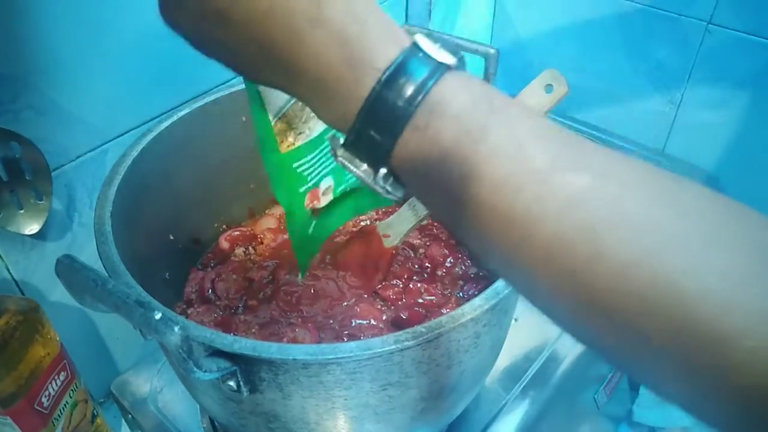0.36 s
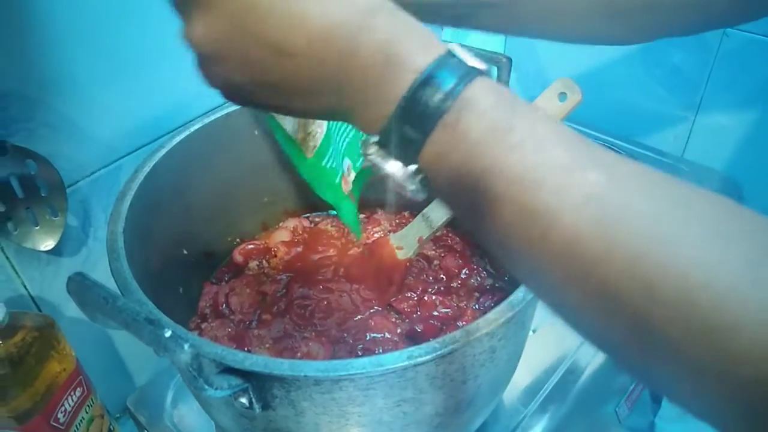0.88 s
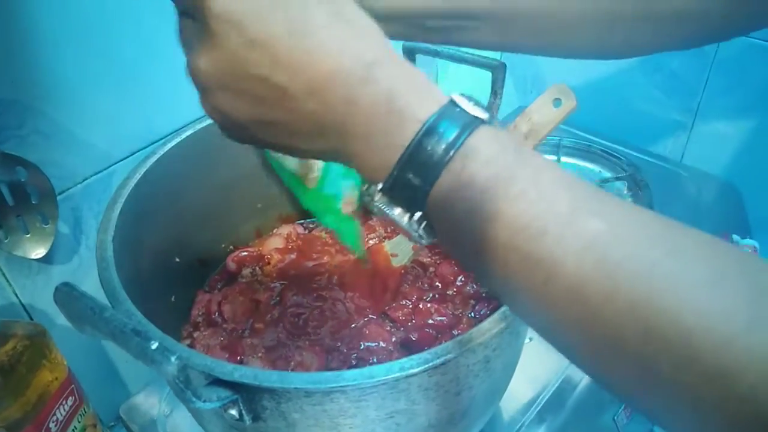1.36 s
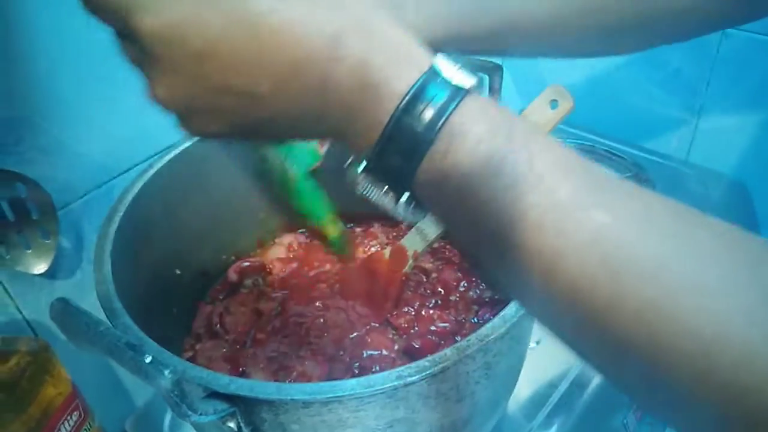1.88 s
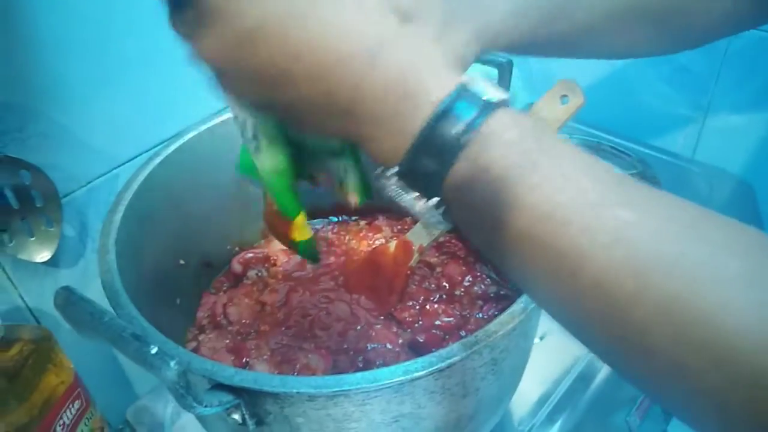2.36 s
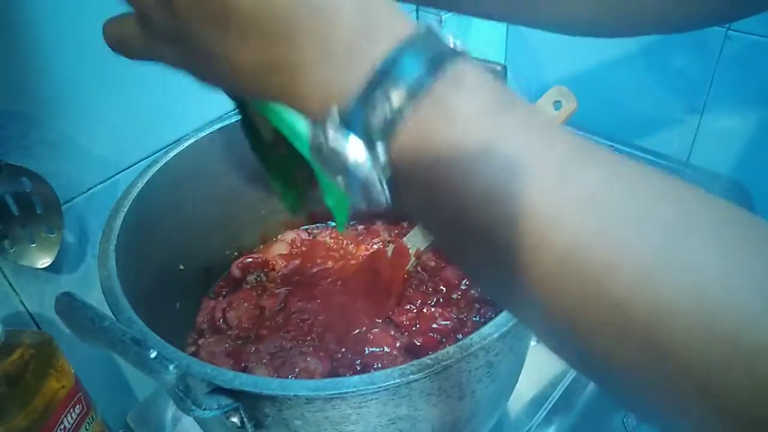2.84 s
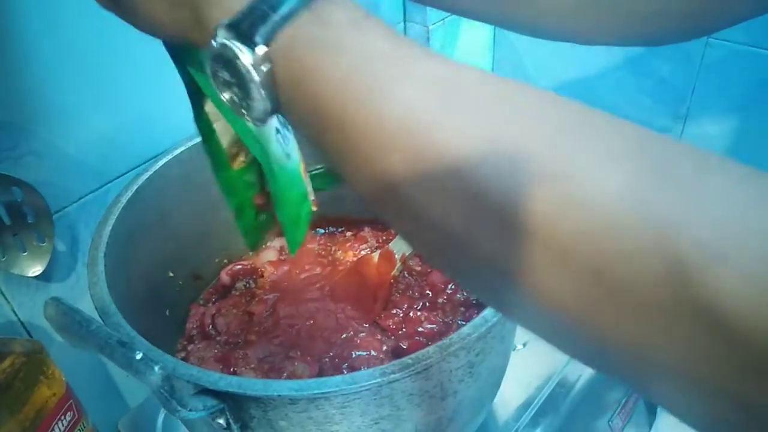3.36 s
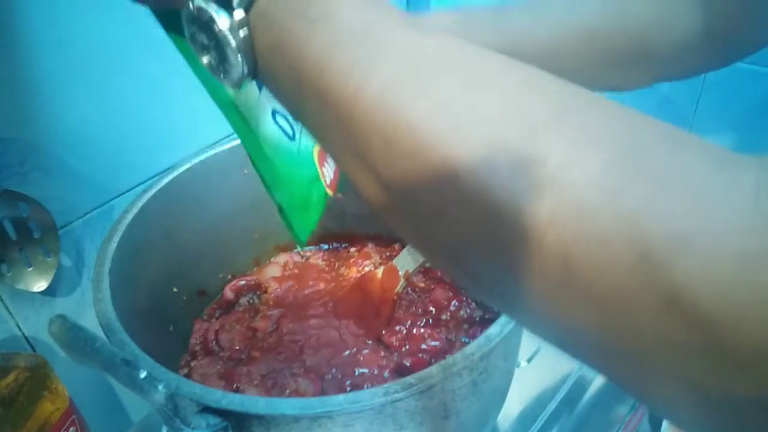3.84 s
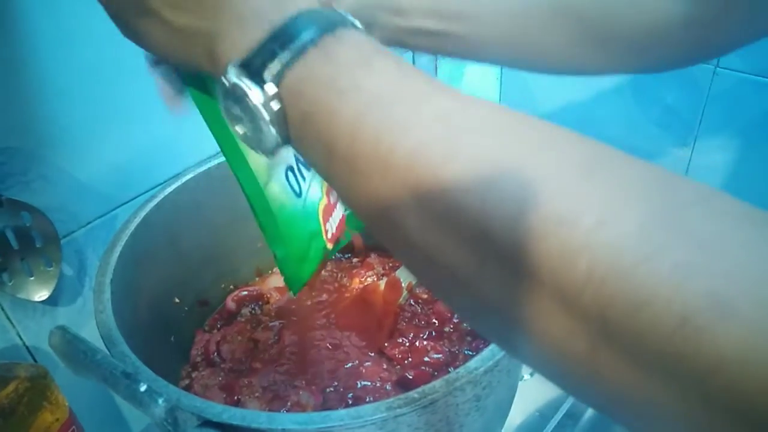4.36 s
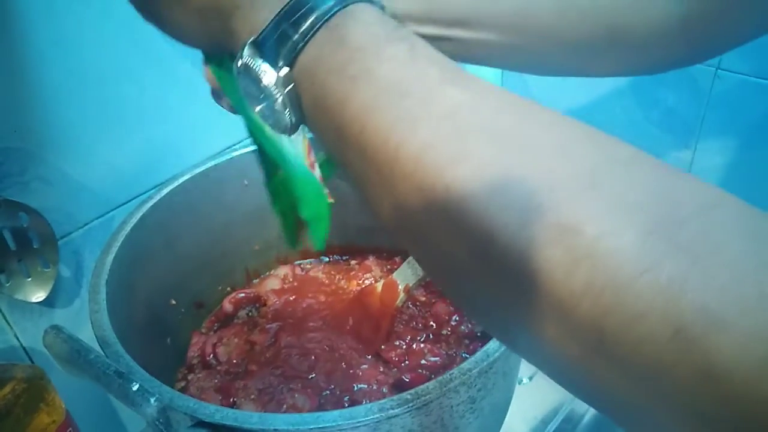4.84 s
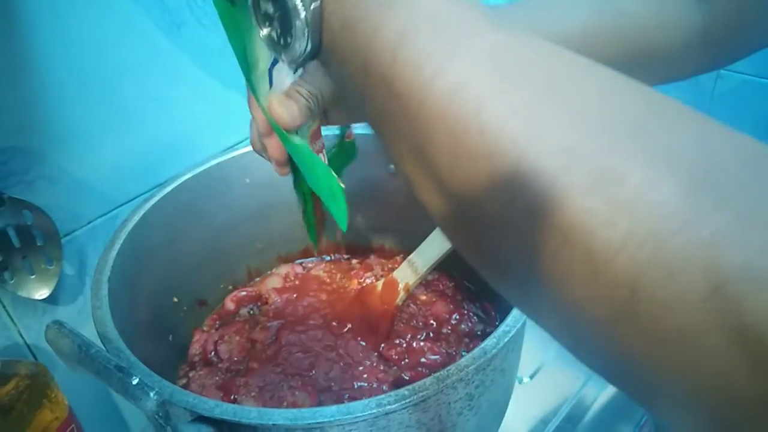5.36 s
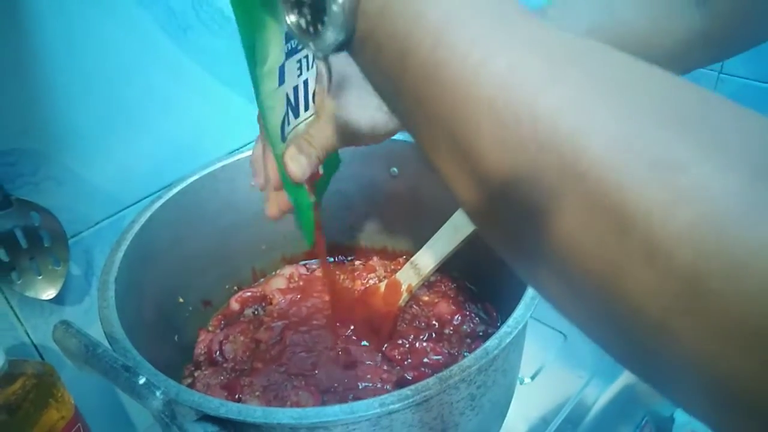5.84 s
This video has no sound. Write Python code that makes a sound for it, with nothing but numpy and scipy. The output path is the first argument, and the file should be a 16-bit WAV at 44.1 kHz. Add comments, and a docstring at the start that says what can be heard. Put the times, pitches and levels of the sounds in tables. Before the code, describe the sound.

Hands squeeze and shake a foil pouch very close: bright irregular snaps and fine crinkling, strongest just before one second and busy until nearly three, then sparser with a few sharp clicks. Small pitched bubble pops and a thin simmering hiss lie below, with a low rumble throbbing about twice a second. A small tiled kitchen adds short tails; two spaced microphones with noise suppression make the hiss swell after snaps.

```python
"""Hands squeeze and shake a foil pouch, close by: it snaps in showers of clicks and rustles in clumps of tiny ones.
Below it sauce simmers in a metal pot: bubbles pop as short swelling tones over a hiss of patchy noise.
A small tiled kitchen answers with noisy tails; a low noise rumble throbs underneath, with one knock.
Two spaced microphones feed a noise suppressor that pushes the steady hiss down and lets it through after each snap."""
import sys
import numpy as np
from scipy import signal
from scipy.io import wavfile
from scipy.ndimage import uniform_filter1d, minimum_filter1d

SR = 44100
rng = np.random.default_rng(int(sys.argv[2]) if len(sys.argv) > 2 else 0)


def dump_mix(stems):
    """Bounce the given channels to the path in sys.argv[1] as a 16-bit WAV at rate SR."""
    frames = np.atleast_2d(stems).T  # one column per channel
    limited = np.clip(frames, -1, 1)  # hard clip at full scale
    pcm = np.round(limited * 32767).astype(np.int16)
    wavfile.write(sys.argv[1], SR, pcm)


def boost_factor(decibels):
    """Convert a level in decibels to a linear amplitude factor."""
    exponent = np.asarray(decibels, float) / 20
    return 10 ** exponent


N = 273861  # samples

# foil snaps, levels at the top of the burst before each crease's left-right lean:
# snap_s, treble_db, middle_db, low_db, burst_ms
FOIL_SNAPS = [(0.0655, -38.5, -50, -56, 12), (0.1568, -36, -50.5, -54.5, 4), (0.3826, -41, -55, -69, 14),
              (0.5072, -31.5, -50, -49, 6.4), (0.5643, -43, -48, -48.5, 3.4),
              (0.784, -33.5, -38, -33.5, 4.3), (0.8047, -28.5, -41, -39, 10), (0.84, -46, -31, -29.5, 5.94),
              (0.8583, -15, -17, -21, 2.36), (0.8676, -14.5, -25, -16, 2), (1.0524, -49, -80, -62, 11),
              (1.1936, -41.5, -57.5, -58, 13), (1.3054, -30.5, -78, -57, 5), (1.4037, -31, -48, -47, 6.5),
              (1.506, -22.5, -28, -28, 2.8), (1.672, -25.5, -40, -47.5, 5.3), (1.753, -46, -54, -39, 4.5),
              (1.7905, -30.5, -46, -38, 4.3), (1.8307, -22.5, -24, -22.5, 3.9),
              (1.8549, -27, -62, -24.5, 4.2), (1.966, -21, -33, -31, 3.2), (1.996, -25, -49, -52.5, 5.1),
              (2.1793, -28.5, -55, -69, 4.5), (2.1947, -31.5, -31.5, -39.5, 3.9),
              (2.3612, -27, -33, -56.5, 5.7), (2.378, -27.5, -37, -67, 5.4), (2.5018, -28, -72, -50, 8.1),
              (2.5288, -15, -50, -39.5, 3.5), (2.54, -30.5, -62, -53, 14), (2.5615, -26, -57, -56, 1.5),
              (2.59, -29.5, -73, -44, 23.5), (2.717, -32, -53.5, -51, 4.5), (2.802, -28.5, -60, -52, 2.6),
              (2.816, -29.5, -67, -69, 8), (3.2126, -43.5, -72, -56.5, 3.9), (3.3075, -43, -53.5, -61, 10),
              (3.3993, -42.5, -60, -59, 12), (3.6308, -35, -24.5, -19.5, 2.4),
              (3.647, -22.5, -30.5, -38, 11), (3.745, -45, -38, -35, 6), (3.9009, -44.5, -52, -54.5, 15),
              (3.92, -33, -60.5, -59, 3), (4.199, -27, -31.5, -45.5, 10.1), (4.2111, -17, -26, -48, 2),
              (4.377, -34, -56, -54, 11), (4.5306, -41, -55, -79, 6.2), (4.6414, -38.5, -30, -52, 3.5),
              (4.6686, -34, -42, -53, 13), (4.722, -42, -50, -49, 5.5), (5.0205, -43, -58.5, -56, 8.2),
              (5.132, -36, -32, -35.5, 2.5), (5.464, -42.5, -68, -60, 24), (5.6324, -37.5, -81, -69.5, 2.7),
              (5.747, -38, -62.5, -66, 5.2), (5.787, -42, -66.5, -66, 3.1), (5.9046, -27, -39, -49, 2.02),
              (5.922, -36, -51.5, -64, 15), (5.98, -43, -77, -60, 18)]
# spectrum of the snapping foil: frequency_hz, relative_level_db
FOIL_SPECTRUM = [(210, -33.5), (350, 0.5), (409, 14), (471, 20), (623, -14.5), (763, 2.5), (1060, 7),
                 (2000, 9), (2870, 1.5), (3900, -1), (5000, -1), (6100, 0), (7100, 2.5), (11100, -13.5),
                 (14500, -24.5)]
# handling of the pouch between snaps: time_s, level_db
RUSTLE_LEVEL = [(0.0, -55.5), (0.62, -56), (1.4, -55), (1.5, -83), (1.78, -47.5), (1.89, -58), (2.3, -65),
                (2.56, -55.5), (2.92, -58), (3.14, -86), (3.3, -54), (3.95, -73.5), (4.3, -60.5),
                (4.42, -55), (4.7, -56), (5.53, -70.5), (5.93, -57.5), (6.21, -79)]
# spectrum of the rustle: frequency_hz, relative_level_db
RUSTLE_SPECTRUM = [(750, -30.5), (1030, -7), (1500, -24), (1980, -3), (2390, -13.5), (3240, -24),
                   (5300, -10), (8520, -2), (14500, -37.5)]
# pitched pops of bubbles, the hollow pot and pockets in the pouch, levels ahead of the microphone gains:
# time_s, peak_db, pitch_hz
BUBBLE_POPS = [(0.348, -32.5, 1014), (0.597, -41.5, 660), (0.6, -35.5, 1033), (0.615, -31.5, 1064),
               (0.67, -35.5, 1074), (0.8415, -25, 1780), (0.8585, -11.5, 2900), (0.87, -21, 1065),
               (0.861, -29, 683), (0.873, -31.5, 585), (0.887, -36, 424), (1.14, -50, 855),
               (1.146, -39, 1130), (1.312, -47.5, 1185), (1.507, -39, 570), (1.524, -44, 401),
               (1.7559, -36.5, 2040), (1.79, -27, 1990), (1.813, -30, 1037), (1.8338, -27, 1760),
               (1.836, -40.5, 767), (2.135, -48, 993), (2.198, -40, 1380), (2.239, -46.5, 940),
               (2.37, -49, 442), (2.596, -36.5, 986), (3.566, -50, 434), (3.697, -43, 1000),
               (3.774, -32, 1043), (4.199, -47, 510), (4.21, -39, 923), (4.469, -51.5, 2230),
               (4.564, -54, 1430), (4.621, -48.5, 1070), (4.642, -31.5, 2520), (4.713, -43.5, 1790),
               (4.847, -49, 1115), (4.848, -50, 1900), (4.902, -41.5, 1910), (4.903, -48.5, 1060),
               (4.928, -48.5, 427), (5.104, -50.5, 1780), (5.134, -34, 1720), (5.499, -48.5, 521),
               (5.518, -48, 1090), (5.515, -42.5, 1770), (5.527, -47.5, 2350)]
# decay of the tiled kitchen: frequency_hz, t60_s
KITCHEN_DECAY = [(400, 0.32), (1060, 0.25), (2790, 0.29), (7350, 0.26)]
# left-right likeness of the simmer and the room tails: frequency_hz, likeness (1 = alike)
MIC_LIKENESS = [(60, 0.86), (240, 0.7), (930, 0.35), (3670, -0.02), (14400, 0.04)]
# spectrum of the simmer: frequency_hz, relative_level_db
SIMMER_SPECTRUM = [(150, -34), (250, -5), (575, 3.5), (864, -3.5), (1020, 1), (1440, -11.5), (2200, -6),
                   (4120, -13.5), (5790, -7), (8280, 0.5), (9480, -12), (12700, -24.5), (14500, -40.5)]
# level of the simmer before its flutter and the suppressor: time_s, level_db
SIMMER_LEVEL = [(0, -54), (2.2, -53.5), (3.05, -57), (4, -56.5), (6.21, -56.5)]
# spectrum of the low rumble: frequency_hz, relative_level_db
RUMBLE_SPECTRUM = [(15, -54.5), (25, -41.5), (27, -21.5), (44, -29), (91, 11), (111, 3), (152, -25.5),
                   (182, -4.5), (215, -21.5), (320, -42.5), (420, -42), (700, -120)]
# level of the low rumble, about which it throbs: time_s, level_db
RUMBLE_LEVEL = [(0.0, -53.5), (0.95, -54.5), (1.3, -47), (1.8, -53), (6.21, -57.5)]


def read(points, hz):
    """Reads a table along a log-frequency axis."""
    f, value = np.transpose(points)
    return np.interp(np.log(hz + 1), np.log(f + 1), value)


def curve(rows):
    """Joins (time_s, value) rows into one value a sample."""
    return np.interp(np.arange(N) / SR, *np.transpose(rows))


def evened(x):
    """Scales to rms 1."""
    return x / np.sqrt(np.mean(x ** 2) + 1e-20)


def add(mix, s, sound):
    """Mixes a sound in at time s."""
    part = mix[..., round(s * SR):][..., :sound.shape[-1]]
    part += sound[..., :part.shape[-1]]


def colour(points):
    """Causal (minimum-phase) filter with the given spectrum, energy 1."""
    gain_db = np.maximum(read(points, abs(np.fft.fftfreq(4096, 1 / SR))), -100)
    log_gain = np.log(boost_factor(gain_db))
    taps = np.fft.ifft(np.exp(np.conj(signal.hilbert(log_gain)))).real[:1024]
    return taps / np.linalg.norm(taps)


def band(x, edges_hz):
    """Steep band-pass scaled to rms 1."""
    edges_hz = np.clip(edges_hz, 20, SR / 2 - 99)
    sos = signal.butter(N=5, Wn=edges_hz, btype="band", fs=SR, output="sos")
    return evened(signal.sosfilt(sos, x))


def flutter(seconds):
    """Random wander of rms 1 that changes within the given time."""
    span = max(round(seconds * SR), 2)
    return evened(uniform_filter1d(uniform_filter1d(rng.standard_normal(N), span), span))


def two_mics(left, other, points, hz):
    """Makes the right side share part of the left in each band, as two spaced microphones do."""
    same = np.clip(read(points, hz), -1, 1)[:, None]
    return np.array([left, same * left + np.sqrt(1 - same ** 2) * other])


def steady(points, size, patchy_db, same):
    """Two-channel noise from random short-time spectra with narrow drifting streaks."""
    frames, hz = 4 * N // size + 5, np.fft.rfftfreq(size, 1 / SR)
    a, b, c, d, patches = rng.standard_normal((frames, len(hz), 5)).T
    patches = uniform_filter1d(patches, size=3, axis=0)  # across frequency
    patches = evened(uniform_filter1d(patches, size=20, axis=1))  # along time
    z = two_mics(a + 1j * b, c + 1j * d, same, hz)
    z *= boost_factor(read(points, hz)[:, None] + patchy_db * patches)
    return evened(signal.istft(z, nperseg=size, noverlap=3 * size // 4)[1][:, :N])


def pop(peak_db, hz, cycles, rise):
    """A tone that swells and dies while its pitch drifts; high pops start abruptly, low ones are rounded."""
    turns = np.arange(round(1.5 * cycles * SR / hz)) * hz / SR
    shape = turns ** np.clip(1900 / hz, .6, 2) * boost_factor(-100 * turns / cycles)
    tone = np.sin(2 * np.pi * (turns + rise * turns ** 2 / cycles))
    return boost_factor(peak_db) * shape / shape.max() * tone


def faint_creases():
    """Weak snaps at chance moments, in the columns of FOIL_SNAPS."""
    per_s, lowest_db, spread_db, body_db, mean_ms = 4, -54, 6, -11, 9
    rows = []
    for when, size, long in rng.random((round(per_s * N / SR), 3)):
        treble_db = lowest_db + spread_db * size
        rows.append((0.0097 + when * N / SR, treble_db, treble_db + body_db,
                     treble_db + 2 * body_db, mean_ms * (.5 + long)))
    return rows


def burst_shape(t, burst_ms):
    """A soft noise ramp leads into the snap, which swells and dies, then crackles as the foil settles."""
    ramp_s, ramp_db = 0.0042, -17.5
    u = 1000 * np.maximum(t, 0) / max(burst_ms, .8)  # time in burst lengths
    settling = 0.09 * np.exp(-t / 0.05) * np.repeat(rng.random(len(t) // 64) < .15, 64)
    fade = (np.exp(-u) + settling) * (1 - np.exp(-u)) * 2
    return fade + boost_factor(ramp_db) * np.exp(np.minimum(t / ramp_s, -u))


def foil_snaps():
    """A crease buckles: a shower of clicks swells and dies, coloured by the foil; weak creases sound thinner."""
    low_hz, middle_hz, treble_hz = (840, 1700), (1844, 3617), (3830, 14000)
    thin_below_db, thin_hz_per_db = -26, 200  # weaker snaps lose the lower treble
    treble_rise_s = 0.0024  # the treble is halved at the snap and recovers
    lean_db, lean_scatter_db = 1.2, 3  # left over right, and spread from crease to crease
    left_late_ms, late_scatter_ms = 0.22, 0.12  # the pouch is nearer the right microphone
    out, foil = np.zeros((2, N)), colour(FOIL_SPECTRUM)
    t = (np.arange(5120) - 1024) / SR  # starts ahead of the snap, for the lead-in ramp
    treble_rise = 1 - .5 * np.exp(-abs(t) / treble_rise_s)
    for s, treble_db, middle_db, low_db, burst_ms in FOIL_SNAPS + faint_creases():
        pan_db = lean_db + lean_scatter_db * rng.standard_normal()
        late_ms = left_late_ms + late_scatter_ms * rng.standard_normal()
        click_gain = boost_factor(1.3 * np.minimum(rng.exponential(1, len(t)), 3))
        shower = rng.standard_normal(len(t)) * click_gain * (rng.random(len(t)) < .5)
        fade = burst_shape(t, burst_ms)
        # each crease rings its own way
        facets = list(zip(np.geomspace(700, 14000, num=48), 2.4 * rng.standard_normal(48)))
        ring = signal.oaconvolve(shower * fade, foil)
        ring = signal.oaconvolve(ring, colour(facets))[:len(t)]
        thinning_hz = thin_hz_per_db * np.clip(thin_below_db - treble_db, 0, 16)
        snap = boost_factor(low_db) * band(ring, low_hz) + boost_factor(middle_db) * band(ring, middle_hz)
        snap += boost_factor(treble_db) * band(ring, (treble_hz[0] + thinning_hz, treble_hz[1])) * treble_rise
        snap *= np.sqrt(np.mean(fade ** 2) + 1e-12)  # so levels hold for the top of the burst
        start = max(s + t[0] - .0001 * burst_ms, .001)
        add(out[0], start + late_ms / 1000, snap * boost_factor(pan_db / 2))
        add(out[1], start, snap * boost_factor(-pan_db / 2))
    return out


def pouch_rustle():
    """Dense tiny creases under the fingers, in clumps with lulls between."""
    click_gain = boost_factor(2.5 * np.minimum(rng.exponential(1, N), 4))
    clicks = rng.standard_normal(N) * click_gain * (rng.random(N) < 3000 / SR)  # about 3000 a second
    clumps = boost_factor(2.8 * flutter(.012) + 3.2 * flutter(.045))
    creases = signal.oaconvolve(clicks, colour(RUSTLE_SPECTRUM))[:N]
    return boost_factor(curve(RUSTLE_LEVEL)) * evened(clumps * creases)


def faint_bubbles():
    """Faint bubbles at chance moments, in the columns of BUBBLE_POPS."""
    per_s, lowest_db, spread_db, low_hz, high_hz = 10, -60, 7, 500, 2400
    when, size, pitch = rng.random((round(per_s * N / SR), 3)).T
    time_s = 0.0058 + when * (N / SR - .05)
    return list(zip(time_s, lowest_db + spread_db * size, low_hz * (high_hz / low_hz) ** pitch))


def bubbles():
    """Short ringing pops, each roughened by a weaker neighbour of nearby pitch."""
    cycles_at_1khz, longer_power = 21.3, 0.33  # cycles of a 100 dB decay; higher pops ring more cycles
    out = np.zeros(N)
    for s, peak_db, hz in BUBBLE_POPS + faint_bubbles():
        late, detune = rng.random(2)
        cycles = cycles_at_1khz * (hz / 1000) ** longer_power
        add(out, s - 1.8 / hz, pop(peak_db, hz, cycles, rise=0.0014))
        neighbour = pop(peak_db - 19, hz * (0.811 + 0.2 * detune), cycles, rise=.01)
        add(out, s + 0.00293 + 0.016 * late, neighbour)
    return out


def kitchen(x):
    """Sparse taps of random sign, each band dying at its own speed; three tails take turns; bass most alike."""
    build_s = 0.0017  # the tail builds up before it dies
    out, hz = np.zeros((2, N)), np.fft.rfftfreq(256, 1 / SR)
    turn = np.pi * 3.1 * np.arange(N) / SR
    for k in range(3):
        taps = np.zeros((2, SR // 2))
        at = np.arange(200, SR // 2 - 20, 20) + rng.integers(0, 20, (2, (SR // 2 - 201) // 20))
        np.put_along_axis(taps, at, rng.choice([-1., 1.], at.shape), 1)
        t, (left, right) = signal.stft(taps, SR, nperseg=256)[1:]
        decay = boost_factor(-60 * t / read(KITCHEN_DECAY, hz)[:, None]) * (1 - np.exp(-t / build_s))
        tail = signal.istft(two_mics(left, right, MIC_LIKENESS, hz) * decay, SR, nperseg=256)[1]
        share = np.sqrt(2 / 3) * np.cos(turn + k * np.pi / 3)
        out += signal.oaconvolve(x * share, tail / np.linalg.norm(tail[0]), axes=1)[:, :N]
    return out


def simmer():
    """The steady hiss of the sauce: patchy noise whose level flutters."""
    hiss = steady(SIMMER_SPECTRUM, size=1024, patchy_db=3.6, same=MIC_LIKENESS)
    return boost_factor(curve(SIMMER_LEVEL)) * hiss * boost_factor(1.4 * flutter(.015) + 2.2 * flutter(.07))


def knock():
    """One low falling tone near the right microphone."""
    out = np.zeros(N)
    add(out, 1.088, pop(-25, hz=118, cycles=5.5, rise=-0.15))
    return out * [[.3], [1.6]]  # left and right gain


def rumble():
    """Low noise that jumps up once a period and sags evenly."""
    first_s, period_s, fall_db = .04, .434, 13
    phase = (np.arange(N) / SR - first_s) / period_s % 1
    sag_db = -fall_db * uniform_filter1d(phase - .5, size=1500)
    noise = steady(RUMBLE_SPECTRUM, size=2048, patchy_db=0.9, same=[(30, 0.82), (130, 0.68), (300, 0.72)])
    return boost_factor(curve(RUMBLE_LEVEL) + sag_db) * noise


def scene():
    """Near sounds echo in the room; steady sounds lie beneath."""
    foil, pops = foil_snaps() + pouch_rustle(), bubbles()
    room = kitchen(boost_factor(-4.5) * (foil + pops))
    near = foil + pops * boost_factor([[.6], [-.6]])  # pops lean left, in dB
    return near + room + simmer() + rumble() + knock()


def low_pass(x):
    """Removes everything above the highest recorded frequency."""
    return signal.sosfilt(signal.butter(12, 14600, fs=SR, output="sos"), x)


def record(dry):
    """The suppressor opens each narrow band that jumps over its usual floor, holds it open, and shuts it."""
    hold_s, depth_db = 0.067, 9.5  # roughly how long a band stays open, how far it shuts
    hz, t, z = signal.stft(dry, SR, nperseg=512, noverlap=384)
    power = uniform_filter1d((abs(z) ** 2).mean(0), size=3, axis=0)
    power_db = 10 * np.log10(uniform_filter1d(power, size=7, axis=1) + 1e-14)
    over_db = power_db - np.percentile(power_db, 25, axis=1, keepdims=True)
    open_db = 10 + 1.86 * (hz < 3000)[:, None] + 3.0 * (hz < 700)[:, None]  # fully open this far over the floor
    shut = np.clip((open_db - over_db) / 5, 0, 1)
    frames = 2 * round(hold_s * SR / 256) + 1
    shut = minimum_filter1d(shut, frames, axis=1, origin=frames // 2)  # looks back, so openings last
    shut *= (hz > 300)[:, None]  # the bass is never shut
    gain = boost_factor(-depth_db * uniform_filter1d(shut, size=3, axis=1))
    quiet = signal.istft(z * gain, SR, nperseg=512, noverlap=384)[1]
    return low_pass(quiet[:, :N])


dry = scene()
out = record(dry)
dump_mix(out)
```